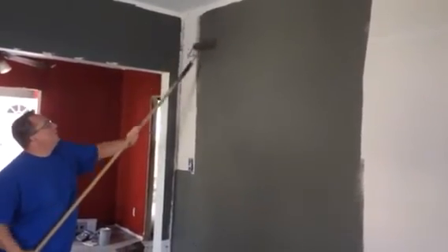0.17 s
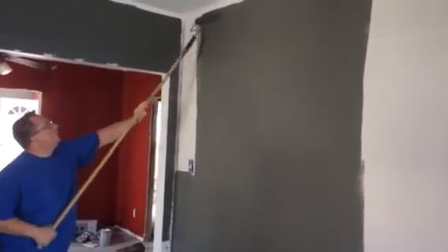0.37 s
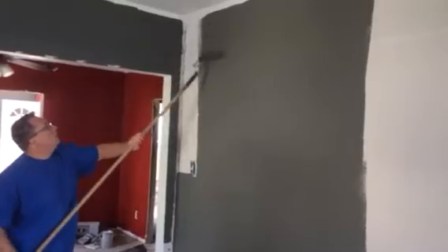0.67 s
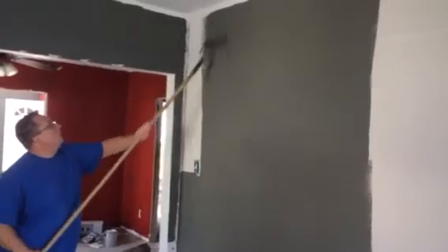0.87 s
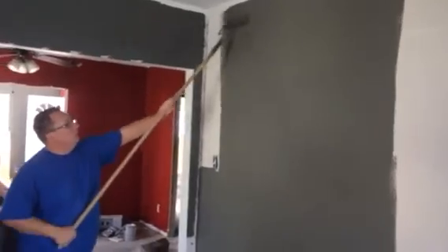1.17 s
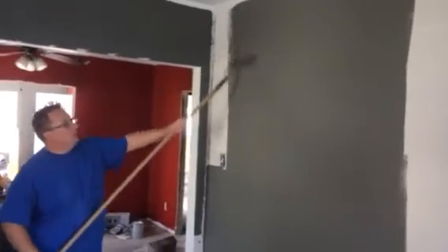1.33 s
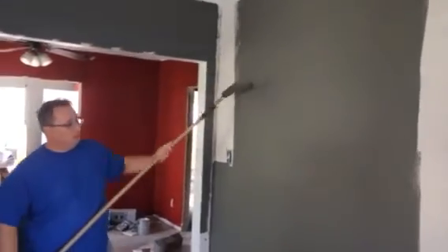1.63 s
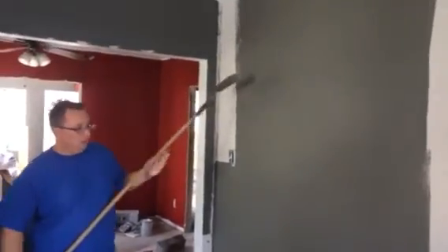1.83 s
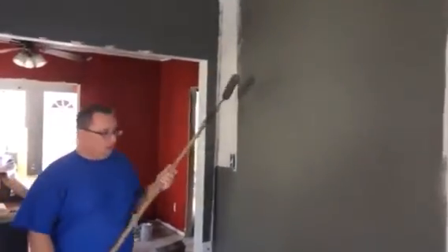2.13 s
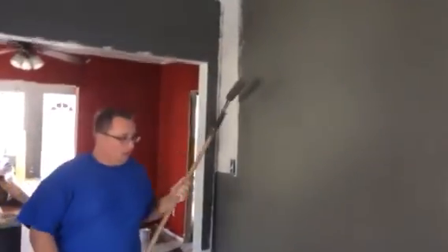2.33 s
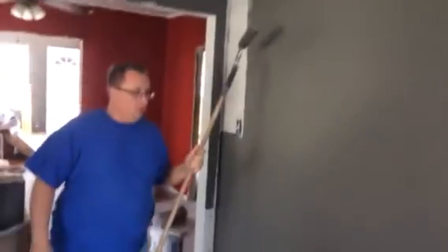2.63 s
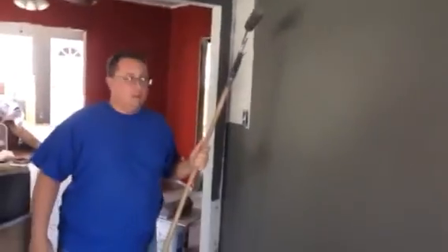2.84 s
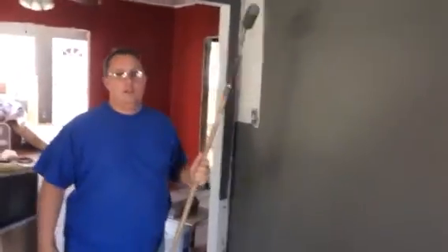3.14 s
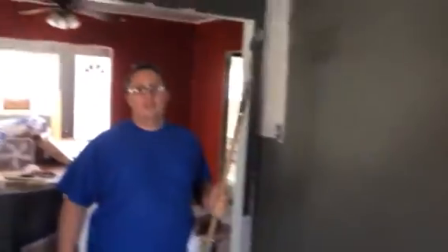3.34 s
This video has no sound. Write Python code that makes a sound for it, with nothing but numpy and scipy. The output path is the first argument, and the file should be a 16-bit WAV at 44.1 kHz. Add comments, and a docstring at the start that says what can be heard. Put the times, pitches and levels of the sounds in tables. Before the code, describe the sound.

Sticky paint roller strokes with low wall rumble and brief frame hums, a sharp rattling knock midway, then shuffling shoes on boards in a reverberant bare room, and a loud dry double thump right at the microphone.

```python
"""Tacky paint crackles off the nap of a wet roller on a long pole, in five strokes on a textured wall.
The crackle is a train of random impulses, filtered; the wall rumbles as low noise, the frame judders as
wavering tones and once knocks hard as a set of ringing modes. The roller slows and lifts off; shoes scuff
as enveloped crackle and thud on the modes of the floor, and a heavy modal bump lands close to the
microphone. A bare room adds a decaying diffuse tail to the paint, knock and shoes."""
import sys
import numpy as np
from scipy import signal
from scipy.fft import rfft, irfft
from scipy.io import wavfile
from scipy.ndimage import uniform_filter1d

SR = 44100
rng = np.random.default_rng(int(sys.argv[2]) if len(sys.argv) > 2 else 0)


def transcribe(u):
    """Save the signal u as a 16-bit wav file named by the first command-line argument.

    u: samples, shape (n,) or (channels, n), limited to [-1, 1]; the rate is SR.
    q: integer samples, one column per channel.
    """
    v = np.clip(np.atleast_2d(u).T, -1, 1)
    q = np.round(v * 32767).astype(np.int16)
    wavfile.write(sys.argv[1], SR, q)


N = 154350  # samples, 3.5 s

# Spectrum of grit crushed underfoot. Each row: frequency in Hz, level in dB.
GRIT_SPECTRUM = [(1500, -33), (3500, -1.5), (7000, -2.5), (11000, -3), (15000, -6)]


def undb(db):
    """Amplitude gain is ten to the power of a twentieth of the decibels."""
    return 10 ** (np.asarray(db) / 20)


def unit(x):
    """Normalisation to a root-mean-square amplitude of 1."""
    return x / np.sqrt(np.mean(x ** 2))


def clock():
    """Sampling: the time of each sample in seconds."""
    return np.arange(N) / SR


def colour(x, points):
    """Linear filtering by a spectrum of (Hz, dB) points, joined over log frequency, to rms 1."""
    hz, db = np.array(points).T
    bins = np.maximum(np.fft.rfftfreq(N, 1 / SR), 1)
    gain = undb(np.interp(np.log(bins), np.log(hz), db))
    return unit(irfft(rfft(x) * gain, N))


def noise(points):
    """Steady turbulence or friction as Gaussian noise of a given spectrum, at rms 1."""
    return colour(rng.standard_normal(N), points)


def crackle(rate, spread_db):
    """Random impulses at a mean rate per second; exponential decibels make most weak and a few strong."""
    size = undb(spread_db * np.minimum(rng.exponential(size=N), 6))
    happens = rng.random(N) < rate / SR
    return happens * size * rng.choice([-1, 1], N)


def burst(start, attack, t60):
    """Transient envelope: a straight rise, then an exponential fall of 60 dB in t60 seconds."""
    age = clock() - start
    rise = np.clip(age / attack, 0, 1)
    return rise * np.exp(-np.log(1000) * np.maximum(age - attack, 0) / t60)


def swell(centre, half):
    """Gaussian envelope, down to 1/e at half seconds from its centre."""
    return np.exp(-((clock() - centre) / half) ** 2)


def ring(start, modes, rise, scatter_db=0):
    """Modal response: damped sines build up over the contact time, each weighted a little at random."""
    age = np.maximum(clock() - start, 0)
    live = (age > 0) & (age < 1)
    out, a = np.zeros(N), age[live]
    for hz, db, t60 in modes:
        gain = undb(db + scatter_db * rng.standard_normal())
        out[live] += gain * np.sin(2 * np.pi * hz * a) * np.exp(-np.log(1000) * a / t60)
    return out * np.sin(np.pi / 2 * np.minimum(age / rise, 1)) ** 2


def room(x, wet_db):
    """Diffuse reverberation: convolution with decaying noise whose treble is absorbed sooner."""
    t60_s, treble_t60_s, split_hz, gap_s = 0.53, 0.11, 5100, 0.0061
    low_pass = signal.butter(2, split_hz, fs=SR, output="sos")
    high_pass = signal.butter(2, split_hz, "high", fs=SR, output="sos")
    low = signal.sosfilt(low_pass, rng.standard_normal(N))
    high = signal.sosfilt(high_pass, rng.standard_normal(N))
    slow = burst(gap_s, gap_s, t60_s)
    fast = burst(gap_s, gap_s, treble_t60_s)
    tail = (low * slow + high * fast)[:SR] / np.sqrt(np.sum(slow ** 2))
    return x + undb(wet_db) * signal.fftconvolve(x, tail)[:N]


def hums(rows):
    """Frequency modulation: brief swelling sines whose pitch wavers with smoothed noise."""
    waver_hz = 19.8  # rms deviation
    out = 0
    for centre, half, hz, db in rows:
        waver = unit(uniform_filter1d(rng.standard_normal(N), size=400))
        phase = 2 * np.pi * np.cumsum(hz + waver_hz * waver) / SR
        out = out + undb(db) * np.sqrt(2) * np.sin(phase) * swell(centre, half)
    return out


def roller():
    """Adhesive rupture: threads of paint snap off the nap, the wall rumbles; lifted off, it spins out."""
    # Stickiness of the strokes. Each row: time in seconds, stroke level in dB.
    strokes = [(0.0, -55), (0.09, -51), (0.188, -56.5), (0.224, -63.5), (0.342, -52), (0.486, -54),
               (0.572, -68), (0.64, -58), (0.766, -46.5), (0.842, -52.5), (0.892, -59), (1.042, -45.5),
               (1.068, -53.5), (1.096, -46.5), (1.212, -66), (1.272, -54.5), (1.444, -46), (1.556, -50),
               (1.578, -58.5), (1.62, -60.5)]
    # The roller coasts and leaves the wall. Each row: time in seconds, stroke level in dB.
    coasting = [(1.7, -62), (1.86, -66.5), (1.95, -64), (2.05, -65.5), (2.15, -62.5), (2.3, -67),
                (2.42, -70), (2.52, -83), (2.64, -80), (2.8, -98), (3.0, -110)]
    # Spectrum of the tearing paint. Each row: frequency in Hz, level in dB.
    paint_spectrum = [(300, -14), (700, -4), (1200, -2.5), (1900, 2), (2750, -3.5), (3800, 0.5), (5200, -1),
                      (7200, -0.5), (11000, -3), (15000, -7)]
    # Spectrum of the wall rumble. Each row: frequency in Hz, level in dB.
    wall_spectrum = [(25, -24), (45, 1), (62, 3.5), (100, 1.5), (135, 1), (200, -2.5), (330, -12.5),
                     (600, -13.5), (1500, -51)]
    # Spectrum of the thin hiss of the lifted roller. Each row: frequency in Hz, level in dB.
    spin_spectrum = [(2000, -25), (3500, -3), (7000, -8), (10500, -11), (12400, 3), (14000, -6),
                     (15500, -12)]
    paint_db, paint_room_db = 2.5, -5  # paint above the stroke level, room tail
    wall_db, wall_follow, full_stroke_db = -52, 0.42, -45  # wall dB per stroke dB, from a full stroke
    stroke_db = np.interp(clock(), *np.vstack([strokes, coasting]).T)
    snaps = crackle(16000, spread_db=2.7)
    paint = colour(snaps, paint_spectrum) * undb(stroke_db + paint_db)
    wall = noise(wall_spectrum) * undb(wall_db + wall_follow * (stroke_db - full_stroke_db))
    spin = noise(spin_spectrum) * undb(-76.5) * swell(2.68, half=0.18)
    return room(paint, paint_room_db) + wall + spin


def frame_judder():
    """Friction-driven vibration: the frame hums with a wavering pitch as the roller drags."""
    # Each row: centre in seconds, half length in seconds, frequency in Hz, level in dB.
    judders = [(0.016, 0.038, 305, -55), (.03, 0.029, 180, -52.5), (0.134, 0.02, 195, -52),
               (0.424, 0.045, 275, -54.5), (0.452, 0.038, 180, -55.5), (0.718, 0.045, 275, -50),
               (1.372, 0.034, 280, -56.5)]
    return hums(judders)


def frame_knock():
    """Impact excitation: each contact clacks and rings frame and pole; they grind, and the wall thuds."""
    # Contacts of the knock and rattle. Each row: start in seconds, relative strength in dB.
    contacts = [(1.008, -13), (1.021, -23), (1.038, -11.5), (1.06, -8), (1.0735, 0.5), (1.0874, -1.5),
                (1.096, -9), (1.104, -3.5), (1.126, -4.5)]
    # Modes of frame and pole. Each row: frequency in Hz, relative level in dB, t60 in seconds.
    frame_modes = [(668, -9, .26), (754, -6, 0.23), (876, -4, 0.24), (950, 4.5, 0.14), (1034, -8, 0.23),
                   (1090, -5, 0.22), (1385, -4, 0.22), (1530, -7, 0.2), (1591, -3, 0.11), (1636, -1, 0.15),
                   (1727, -6, .25), (1910, -4, 0.23), (2218, -12, .25), (2523, -14, .3)]
    # Spectrum of the dry clack. Each row: frequency in Hz, level in dB.
    clack_spectrum = [(80, -9), (150, 1.5), (330, -9.5), (520, -16), (700, -4.5), (950, 1.5), (1230, -5.5),
                      (1700, -3), (2200, -10.5), (2750, -15.5), (4100, -17.5), (6000, -29), (14000, -28)]
    # Spectrum of the grinding frame. Each row: frequency in Hz, level in dB.
    grind_spectrum = [(1200, -12), (2200, 5.5), (2900, 1), (3500, 0), (4300, 4), (5500, -10), (9000, -31)]
    # Modes of the wall panel. Each row: frequency in Hz, level in dB, t60 in seconds.
    panel_modes = [(131, -40, .4), (188, -44, .25)]
    ring_db, clack_db, clack_t60_s, room_db = -43.5, -29, 0.1, -6.5
    contact_s = 0.00082
    rings, clack_power = 0, 0
    for start, db in contacts:
        rings = rings + undb(db + ring_db) * ring(start, frame_modes, contact_s, scatter_db=1)
        # independent clacks add in power
        clack_power = clack_power + (undb(db + clack_db) * burst(start, 0.00047, clack_t60_s)) ** 2
    clacks = np.sqrt(clack_power) * noise(clack_spectrum)
    grind = undb(-40) * swell(1.101, half=0.018) * noise(grind_spectrum)
    panel = ring(1.074, panel_modes, rise=0.02)
    return rings + panel + room(clacks + grind, room_db)


def shoe_scuffs():
    """Sliding friction: shoe scuffs and pole shifts as short rubs of varied brightness, with gritty treble."""
    # Each row: start in seconds, attack in seconds, t60 in seconds, level in dB,
    # strongest frequency in Hz, level of the gritty treble in dB.
    rubs = [(1.70, .004, .15, -51, 1210, -78), (1.92, 0.021, 0.45, -55.5, 1670, -64),
            (2.064, 0.021, 0.24, -51, 2080, -78), (2.191, 0.0031, 0.36, -47.5, 1240, -62),
            (2.234, .025, 0.33, -53, 1650, -75), (2.25, 0.013, .25, -56, 5500, -78),
            (2.319, 0.026, 0.36, -54.5, 1290, -76), (2.42, 0.011, 0.18, -57.5, 2050, -74),
            (2.876, 0.013, 0.43, -47, 1480, -58), (2.908, 0.0021, 0.29, -43.5, 1620, -54.5),
            (2.95, 0.055, 0.23, -50.5, 1280, -57.5), (3.09, 0.012, .15, -59, 1400, -77),
            (3.158, 0.0041, .2, -53.5, 1500, -69)]
    # Spectrum of a rub. Each row: multiple of its strongest frequency, level in dB.
    rub_spectrum = [(.08, -10.5), (.2, -1.5), (.38, -7), (.65, -1), (1, -1.5), (1.35, -2.5), (1.8, -11.5),
                    (2.6, -15), (4.5, -23), (9, -44)]
    grit = colour(crackle(7000, spread_db=2.5), GRIT_SPECTRUM)
    out = 0
    for start, attack, t60, db, hz, grit_db in rubs:
        points = [(hz * multiple, level) for multiple, level in rub_spectrum]
        rub = colour(crackle(5000, spread_db=2), points)
        out = out + burst(start, attack, t60) * (undb(db) * rub + undb(grit_db) * grit)
    return room(out, wet_db=-3.5)


def grit_ticks():
    """Brittle fracture: single grains underfoot give tiny sharp bursts of treble noise."""
    # Each row: start in seconds, level in dB.
    grains = [(1.918, -51), (1.96, -49), (2.194, -44.5), (2.38, -60), (2.433, -60), (2.908, -46),
              (2.917, -41.5), (3.0, -51)]
    envelope = sum(undb(db) * burst(start, 0.00055, t60=0.02) for start, db in grains)
    return room(envelope * noise(GRIT_SPECTRUM), wet_db=1.5)


def footfalls():
    """Modal excitation: heel and sole make the boards thud, each with its own balance of modes."""
    # Each row: start in seconds, level in dB, tilt towards the higher modes in dB per octave.
    treads = [(2.012, -50, 2), (2.024, -54, 6), (2.078, -57, 5), (2.245, -53.5, -1), (2.314, -49, 3.5),
              (3.021, -54, -1.5), (3.044, -38.5, 3), (3.064, -33, 3), (3.16, -42, -1), (3.173, -39, -2)]
    # Modes of the floor. Each row: frequency in Hz, level in dB before the tilt.
    board_modes = [(82, -2), (101, 2.5), (140, -3), (168, -0.5), (217, -4), (350, -14.5), (435, -10),
                   (610, -17), (850, -23)]
    boards_t60_s, contact_s, pivot_hz = 0.075, 0.007, 150
    out = 0
    for start, db, tilt in treads:
        modes = []
        for hz, level in board_modes:
            modes.append((hz, level + tilt * np.log2(hz / pivot_hz), boards_t60_s))
        out = out + undb(db) * ring(start, modes, contact_s, scatter_db=3.5)
    return room(out, wet_db=-12)


def floor_sway():
    """Forced vibration: the floor drones with a wavering pitch as weight shifts on it."""
    # Each row: centre in seconds, half length in seconds, frequency in Hz, level in dB.
    sways = [(1.9, 0.12, 128.8, -55), (2.035, 0.026, 160, -45), (2.09, 0.035, 135.5, -50.5),
             (2.33, 0.025, 130, -50)]
    return hums(sways)


def bump():
    """Impact near the microphone: a deep, dry double thump of damped modes, with a contact click."""
    # Blows. Each row: start in seconds, level in dB.
    blows = [(3.4673, -9.5), (3.4858, -15.5)]
    # Modes of the bumped body. Each row: frequency in Hz, level in dB, t60 in seconds.
    body_modes = [(72.6, -7.5, 0.44), (159.4, -4, 0.32), (208.7, -2, 0.28), (240, 3, 0.12),
                  (318, -10, 0.13)]
    # Spectrum of the click. Each row: frequency in Hz, level in dB.
    click_spectrum = [(30, -7), (150, 8), (400, -2), (700, 1.5), (1400, -4.5), (1950, -9), (2400, -19),
                      (4000, -15), (6000, -18), (9000, -28.5), (15000, -40)]
    contact_s = 0.0045
    thump = sum(undb(db) * ring(start, body_modes, contact_s) for start, db in blows)
    click = undb(-30) * burst(3.465, 0.00075, t60=0.29) * noise(click_spectrum)
    return thump + click


def room_air():
    """Stationary background: steady noise of the room, strongest in the bass."""
    # Each row: frequency in Hz, level in dB.
    air_spectrum = [(25, -17), (50, -11), (75, -5), (121, -1), (200, -10), (280, -12), (400, -14.5),
                    (900, -18), (1800, -22), (2900, -30), (4600, -33.5), (10500, -39.5), (15000, -42)]
    return undb(-59) * noise(air_spectrum)


def scene():
    """Superposition: the pressures of all sources add, in one channel."""
    painting = roller() + frame_judder() + frame_knock()
    walking = shoe_scuffs() + grit_ticks() + footfalls() + floor_sway()
    return (painting + walking + bump() + room_air())[None]


def record(dry):
    """Band limiting: a steep elliptic low-pass filter removes the top treble."""
    top_hz = 15350
    low_pass = signal.ellip(12, .1, 80, top_hz, fs=SR, output="sos")  # 0.1 dB ripple, 80 dB stop band
    return signal.sosfilt(low_pass, dry)


dry = scene()
out = record(dry)
transcribe(out)
```